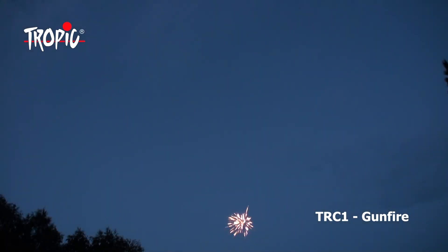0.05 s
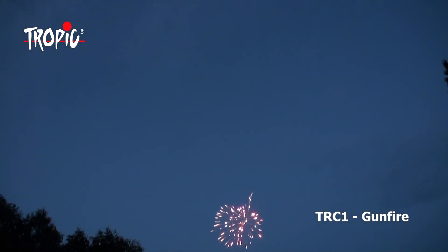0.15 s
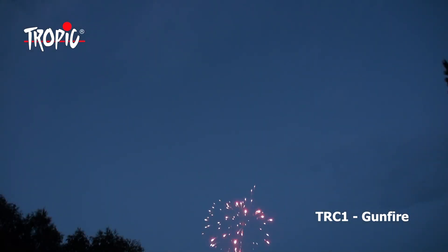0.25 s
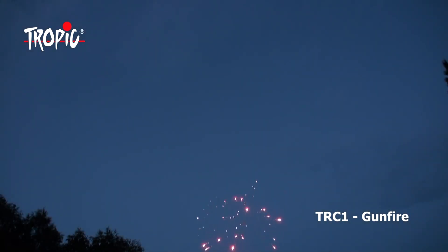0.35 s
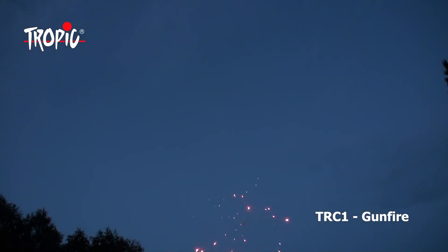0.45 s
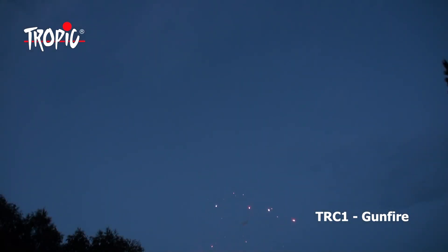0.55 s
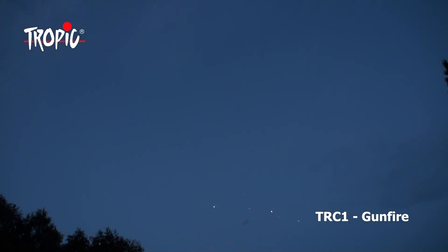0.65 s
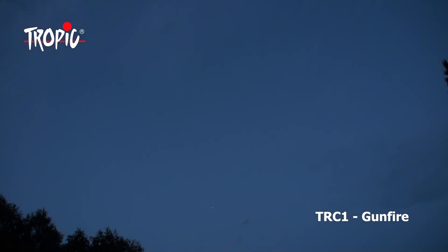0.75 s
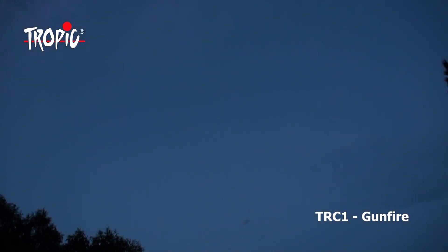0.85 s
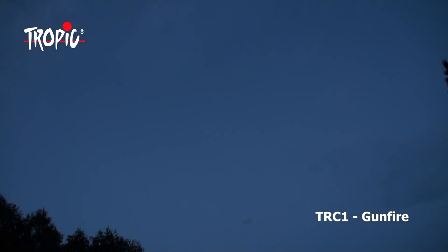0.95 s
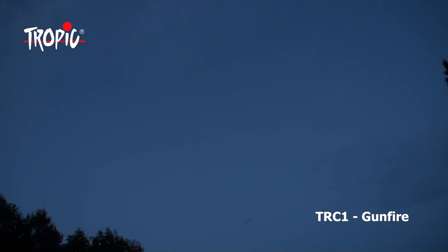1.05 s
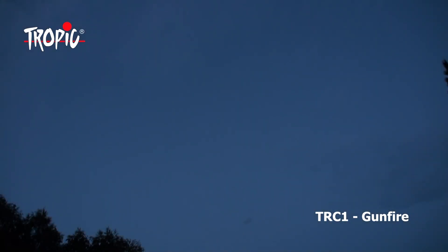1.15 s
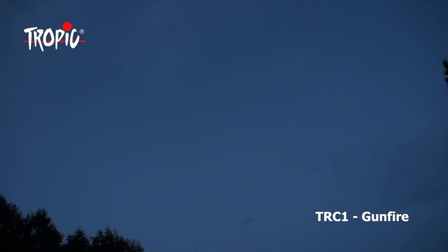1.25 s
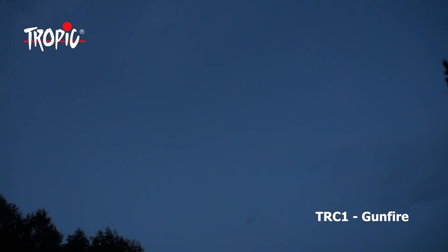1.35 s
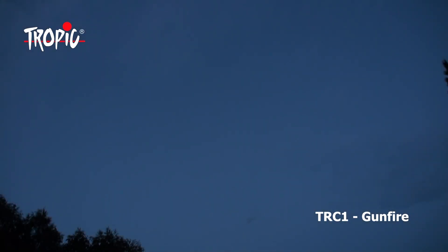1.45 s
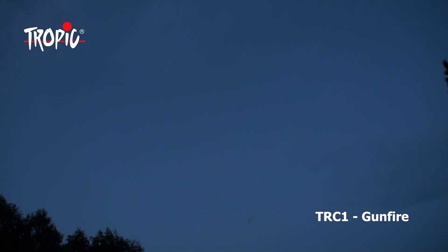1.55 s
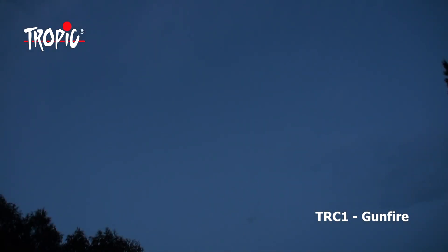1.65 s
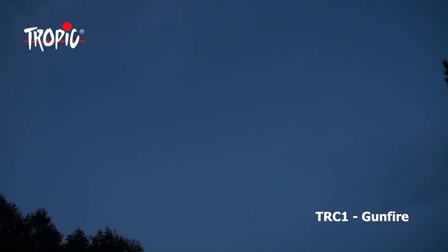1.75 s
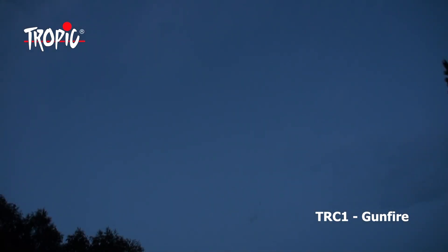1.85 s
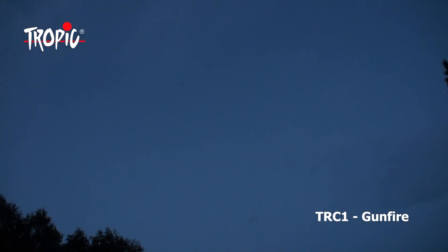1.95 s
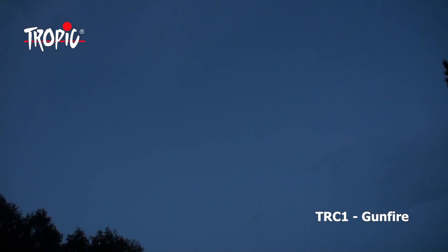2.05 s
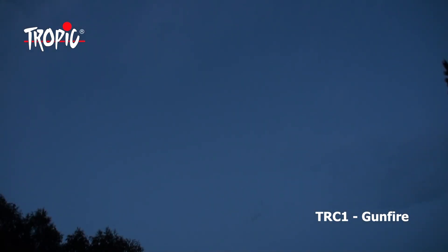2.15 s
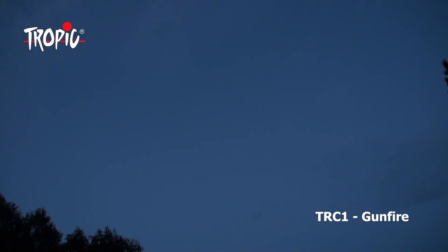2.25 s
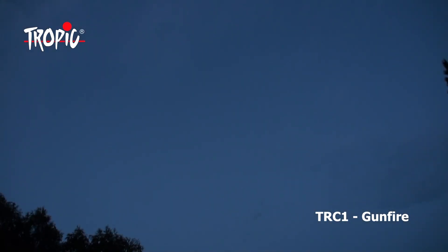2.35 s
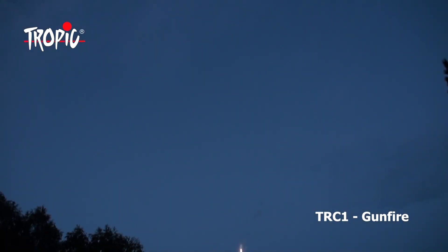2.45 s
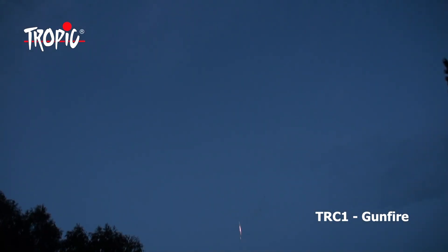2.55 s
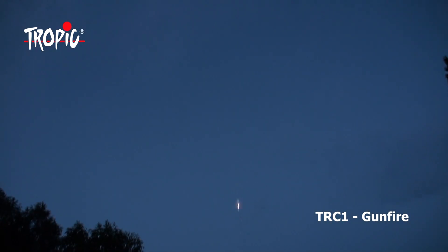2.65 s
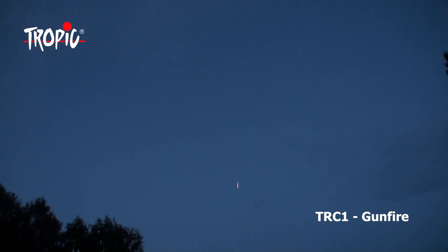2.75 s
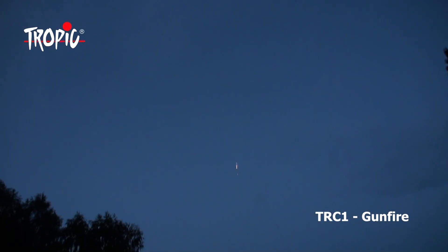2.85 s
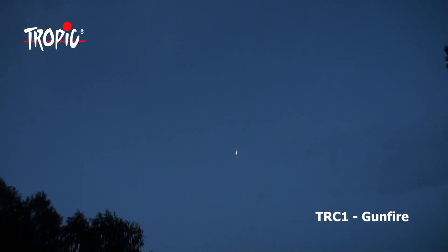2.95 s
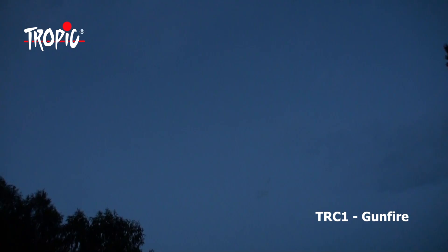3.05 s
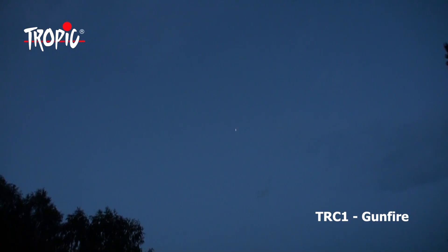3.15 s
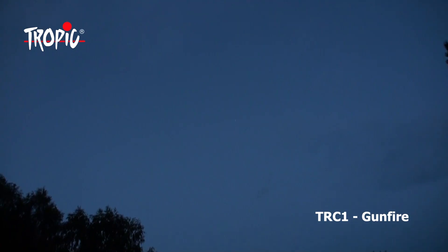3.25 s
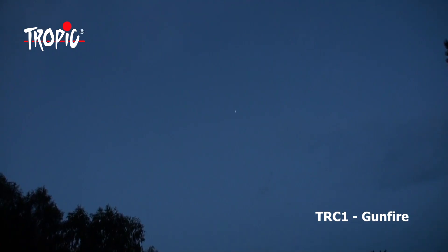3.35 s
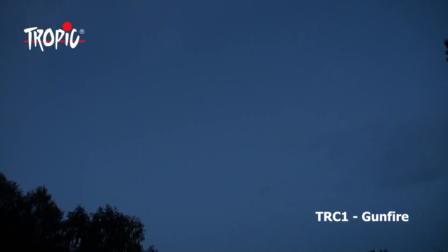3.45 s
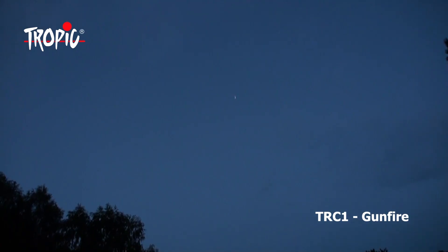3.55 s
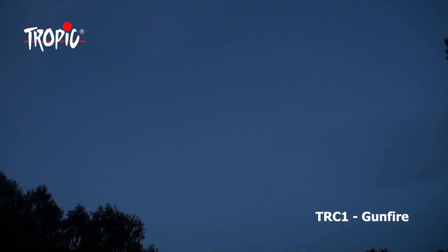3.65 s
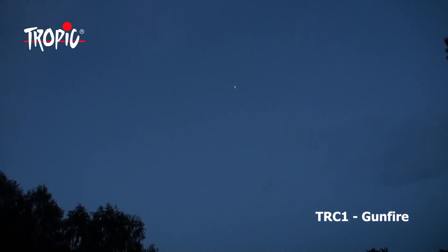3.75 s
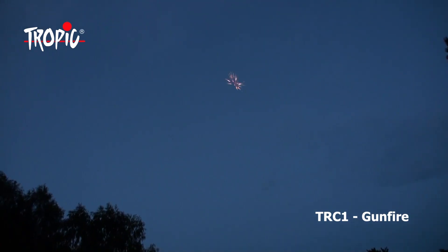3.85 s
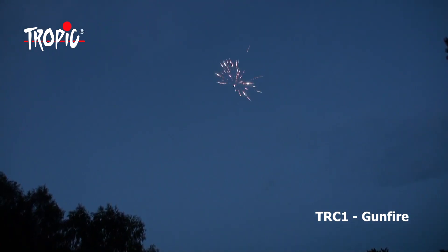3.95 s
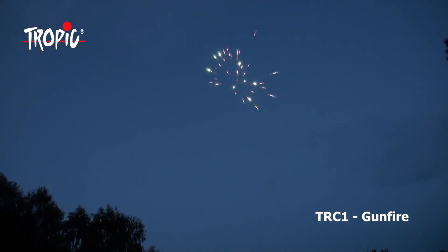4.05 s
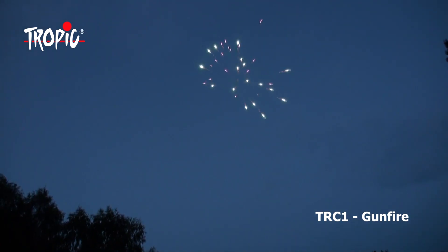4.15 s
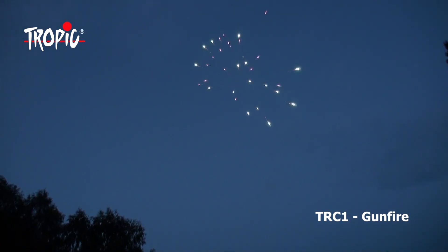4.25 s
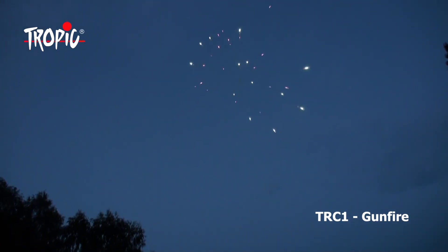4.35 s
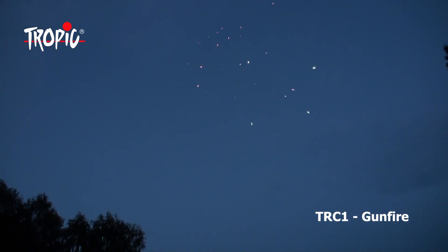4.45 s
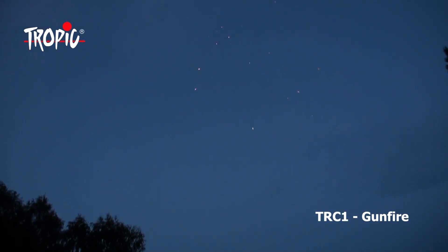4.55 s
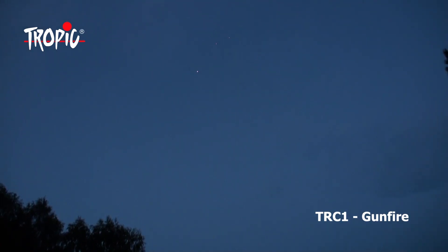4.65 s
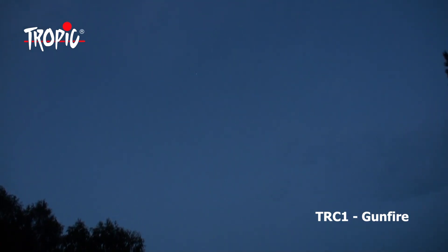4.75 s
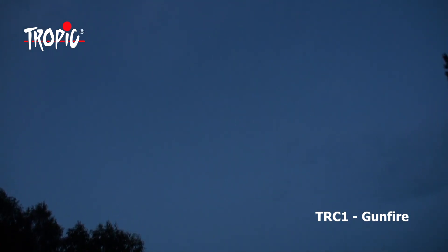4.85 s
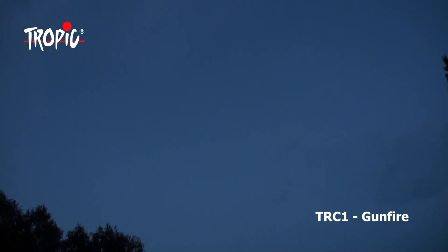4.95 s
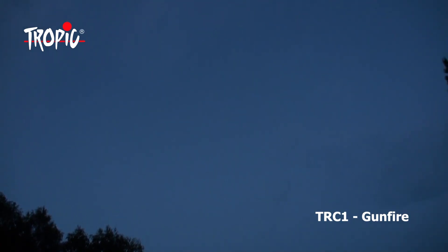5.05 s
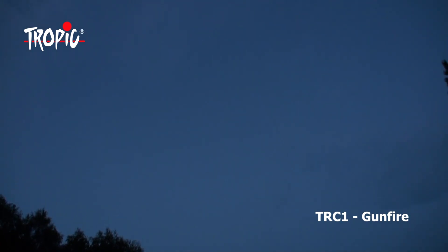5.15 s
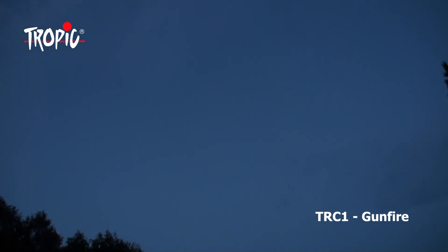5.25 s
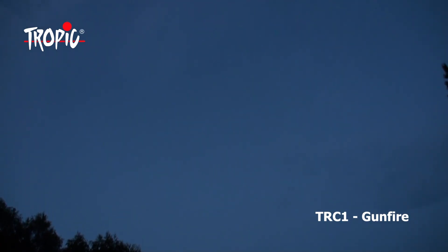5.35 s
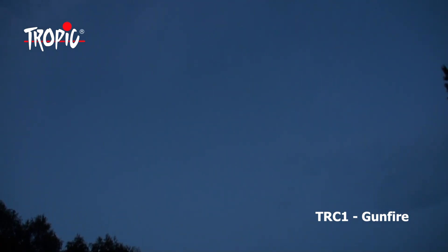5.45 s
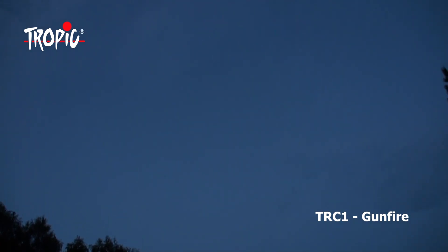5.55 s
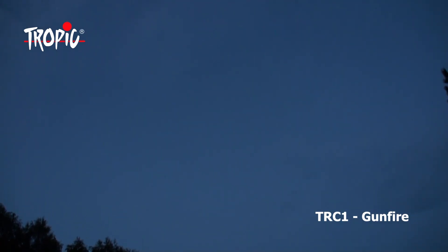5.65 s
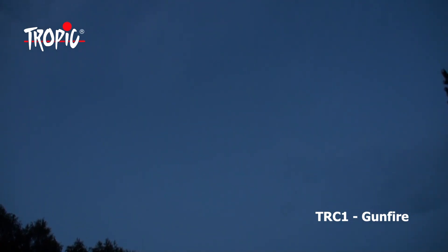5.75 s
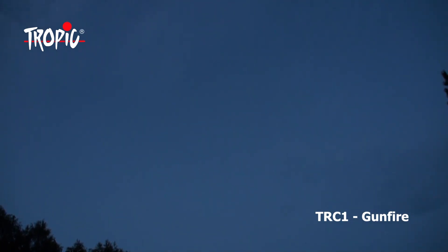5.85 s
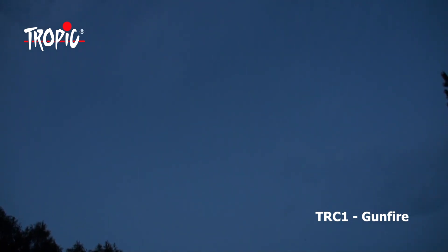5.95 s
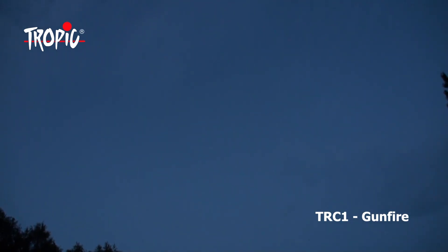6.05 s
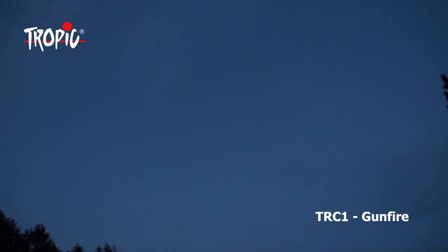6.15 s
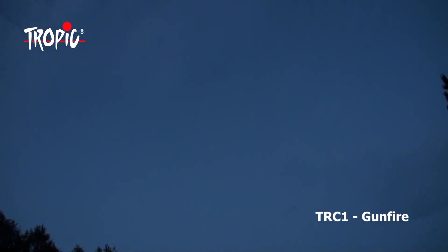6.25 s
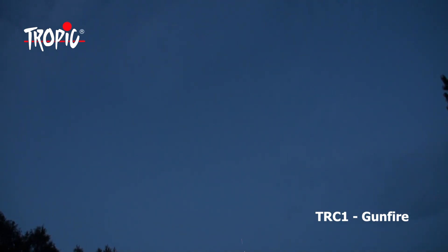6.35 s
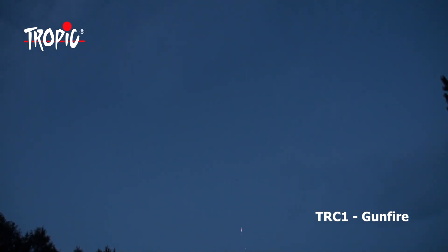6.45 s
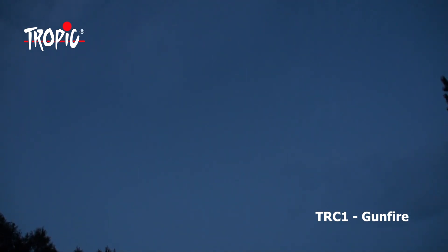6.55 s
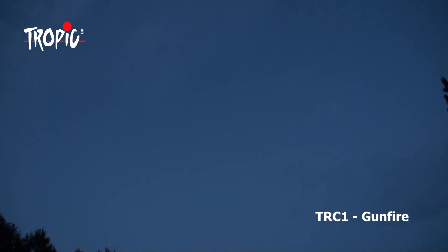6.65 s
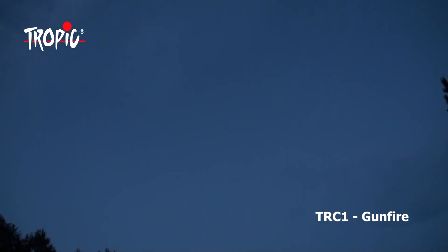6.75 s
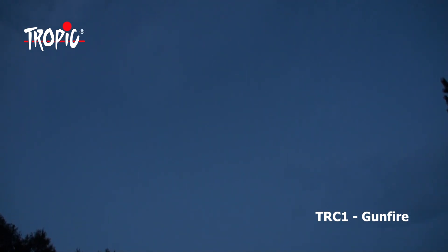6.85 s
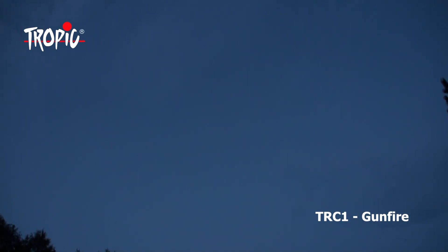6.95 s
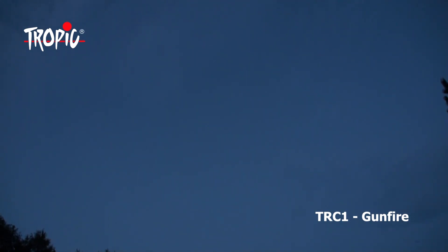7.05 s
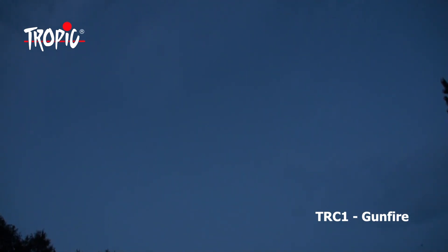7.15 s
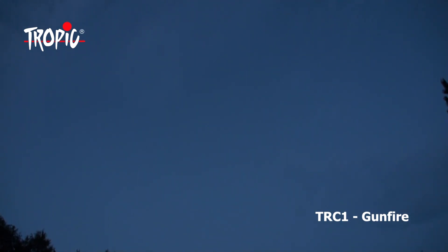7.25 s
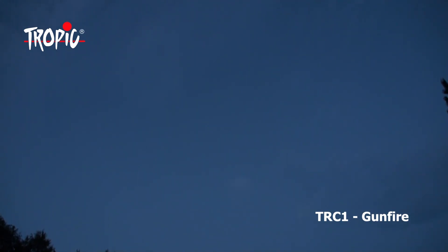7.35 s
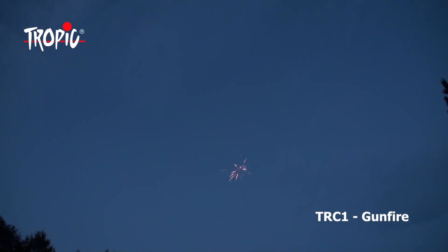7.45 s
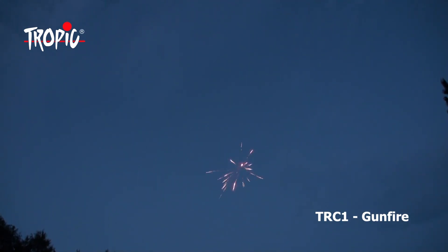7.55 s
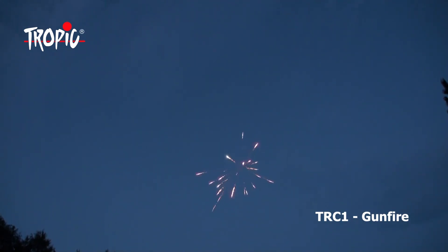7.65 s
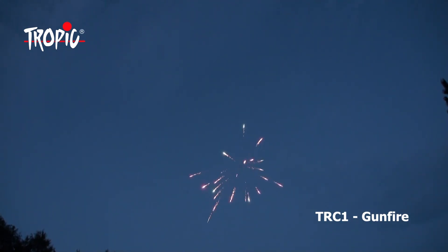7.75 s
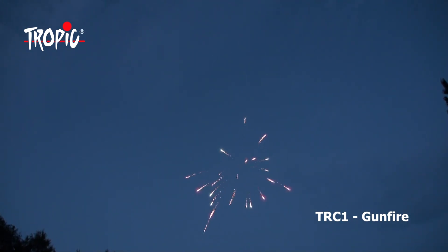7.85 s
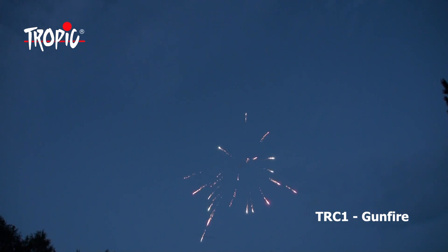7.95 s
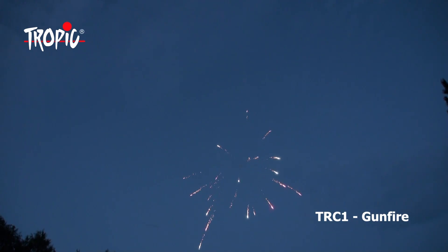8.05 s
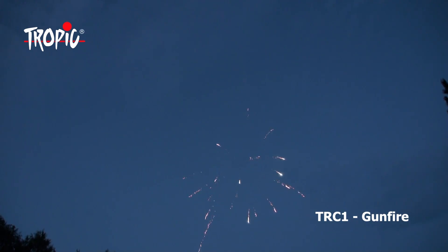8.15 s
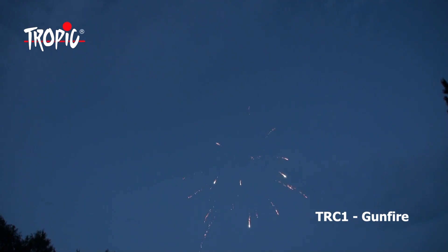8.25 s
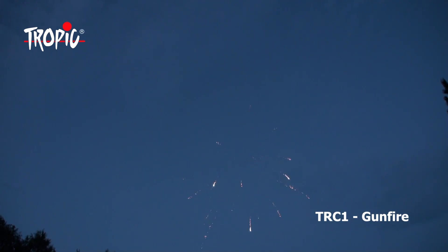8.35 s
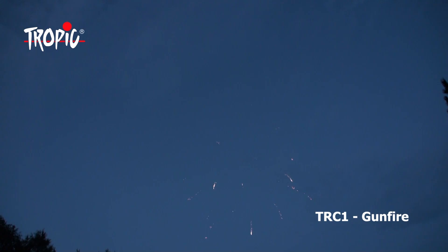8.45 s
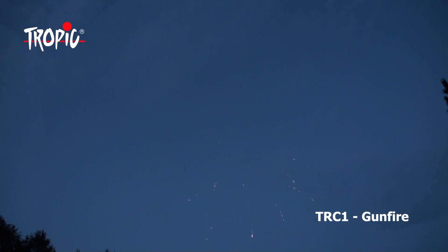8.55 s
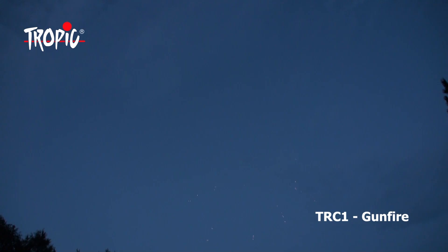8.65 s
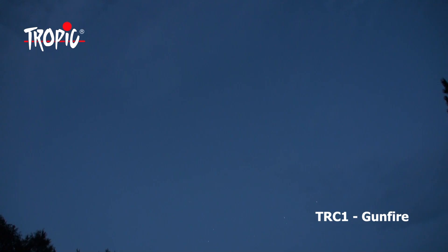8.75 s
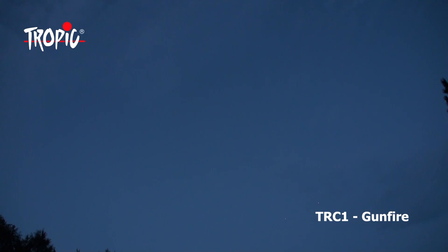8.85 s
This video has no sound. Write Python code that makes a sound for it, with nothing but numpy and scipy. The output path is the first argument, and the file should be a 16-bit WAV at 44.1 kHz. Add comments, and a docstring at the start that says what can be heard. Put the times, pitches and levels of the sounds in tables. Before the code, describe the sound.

Firework shots in open air, alternating loud overhead bangs and dry tube cracks, with rushing tree reflections, dull faraway rumbling and quiet hiss between.

```python
"""Roman candle in the open

Three shells burst overhead, each a broadband pulse with near reflections; a thin bright crack follows two of them.
Between them the tube fires twice: a crack that swings both ways and a short low thump.
Trees and ground scatter each shot into a dense, dying rush of noise, and a dull roll with knocks comes from afar.
Under it lie a low rumble, a faint drone, a fine high hiss, one small tick and a few thin, fluttering whistles."""
import sys
import numpy as np
from scipy import signal
from scipy.fft import rfft, irfft, next_fast_len
from scipy.io import wavfile
from scipy.ndimage import uniform_filter1d

SR = 44100
rng = np.random.default_rng(int(sys.argv[2]) if len(sys.argv) > 2 else 0)


def materialize(psi):
    """Save the field psi as 16-bit PCM at rate SR to the path in sys.argv[1].

    A 1-D psi becomes a single channel; in a 2-D psi each row is a channel.
    """
    bounded = np.clip(np.atleast_2d(psi).T, -1, 1)
    quanta = np.round(bounded * 32767).astype(np.int16)
    wavfile.write(sys.argv[1], SR, quanta)


N = 392490


def gain_of(db):
    """Decibels to a gain."""
    return 10 ** (np.asarray(db) / 20)


def evened(x):
    """Scales a sound to rms 1."""
    return x / np.sqrt(np.mean(x ** 2) + 1e-20)


def read(table, hz):
    """Reads every column of a table along a log-frequency axis."""
    f, *columns = np.transpose(table)
    return [np.interp(np.log(hz + 1), np.log(f + 1), c) for c in columns]


def curve(rows, t):
    """Gain that follows rows of [t/s, level/dB]."""
    return gain_of(np.interp(t, *np.transpose(rows)))


def add(mix, start_s, sound):
    """Mixes a stereo sound in at its start time."""
    part = mix[:, max(round(start_s * SR), 0):][:, :sound.shape[1]]
    part += sound[:, :part.shape[1]]


def smooth_noise(shape, count):
    """Noise averaged over count samples, rms 1."""
    return evened(uniform_filter1d(rng.standard_normal(shape), size=count))


def drift(size, count):
    """A slow random wander of rms 1 that changes over about count samples."""
    return evened(uniform_filter1d(uniform_filter1d(rng.standard_normal(size), count), count))


# How the two microphone ports differ:
# [f/Hz, coherence (0-1), phase by which left leads/rad, left-right level/dB]
PORT_PAIR = [(49.9, 0.88, 1.3, -9), (129.7, 0.96, 1.12, -10), (300, 0.86, 1.11, -5.5),
             (650, 0.89, 1.2, -2.2), (1290, 0.81, 1.38, -4), (2500, 0.64, 1.36, -6.5),
             (4600, 0.45, 0.82, -8.5), (7000, 0.21, 0.44, -11), (9900, 0.17, -0.89, -0.5),
             (13200, .1, .6, -5)]


def ports(white, colour, balance=None):
    """Two unrelated noises become one coloured sound from all around, as the two ports hear it; rms 1."""
    hz = np.fft.rfftfreq(white.shape[1], 1 / SR)
    same, lead, lean_db = read(PORT_PAIR, hz)
    if balance is not None:
        lean_db = read(balance, hz)[0]
    same = np.clip(same, 0, 1)
    shared, separate = rfft(white)
    left = same * shared + np.sqrt(1 - same ** 2) * separate
    left = left * np.exp(1j * lead) * gain_of(lean_db)
    level = gain_of(read(colour, hz)[0]) / np.sqrt(1 + gain_of(lean_db) ** 2)
    return evened(irfft(np.array([left, shared]) * level, white.shape[1]))


def wash(colour, balance=None, lumpy_db=0, lump_s=.02):
    """Coloured noise as long as the scene, whose strength comes in lumps."""
    size = next_fast_len(N, True)
    lumps = smooth_noise(size, max(int(lump_s * SR), 1))
    return ports(rng.standard_normal((2, size)) * gain_of(lumpy_db * lumps), colour, balance)[:, :N]


def knock(colour, rise_s, t60, size=8192):
    """A short smeared knock: coloured noise with a quick rise and an exponential decay."""
    t = np.arange(size) / SR
    noise = ports(rng.standard_normal((2, size)), colour)
    return noise * (1 - np.exp(-t / rise_s)) * gain_of(-60 * t / t60)


def pulse(colour, size=4096):
    """The sharpest causal pulse with a given spectrum (minimum phase), peak 1."""
    hz = abs(np.fft.fftfreq(size, 1 / SR))
    log_gain = np.log(gain_of(read(colour, hz)[0]))
    wave = np.fft.ifft(np.exp(np.conj(signal.hilbert(log_gain)))).real
    return wave / abs(wave).max()


# Stereo lean of the direct waves: [f/Hz, left-right level/dB]
DIRECT_BALANCE = [(35, 0), (70, -2), (140, -5.5), (350, -0.5), (900, -1.5), (2500, -9.5), (6000, -15.5)]


def arrive(wave, paths, left_db, size=8192):
    """A wave reaches the ports as a sum of delayed copies: the direct path and near surfaces."""
    hz = np.fft.rfftfreq(size, 1 / SR)
    same, lead, _ = read(PORT_PAIR, hz)
    right = rfft(wave, size) * sum(k * np.exp(-2j * np.pi * hz * max(s, 0)) for s, k in paths)
    left = right * np.exp(1j * lead * same) * gain_of(read(DIRECT_BALANCE, hz)[0] + left_db)
    fade_out = np.minimum(np.linspace(2, 0, size), 1) ** 2
    return irfft([left, right]) * fade_out


def foliage(colour, uneven_db, size=54000):
    """Countless overlapping reflections, arriving in clumps."""
    clumps = gain_of(uneven_db * smooth_noise(size, 130))
    return ports(rng.standard_normal((2, size)) * clumps, colour)


def swell(t, start_db, rise_s, hold_s, fall_db_per_s, knee_db, late_db_per_s):
    """Gain of the scattered sound against its delay: it builds up, holds, falls fast and lingers below a knee."""
    late = np.maximum(t - hold_s, 0)
    knee_s = -knee_db / fall_db_per_s
    fall_db = np.maximum(-fall_db_per_s * late, knee_db - late_db_per_s * (late - knee_s))
    return gain_of(start_db * np.exp(-t / rise_s) + fall_db)


def die_away(taps, colour, fade, returns, stretch, patchy_db=1.0, count=18):
    """Later reflections weaken, some bands faster than others; trees and slopes throw single bands back."""
    t = np.arange(taps.shape[1]) / SR
    hz, centres = np.fft.rfftfreq(len(t), 1 / SR), np.geomspace(40, 15000, count)
    spectrum = rfft(taps)
    delay, spread, return_hz, octaves, db = np.transpose(returns)
    swells = db[:, None] * np.exp(-((t - delay[:, None]) / spread[:, None]) ** 2)
    out = np.zeros(taps.shape)
    for centre, pick, loss in zip(centres, np.eye(count), read(colour, centres)[1]):
        band = irfft(spectrum * read(np.c_[centres, pick], hz)[0])
        patches = patchy_db * smooth_noise(len(t), 1800)  # each band rolls on its own
        thrown_back = np.exp(-(np.log2(centre / return_hz) / octaves) ** 2) @ swells
        out += band * gain_of(thrown_back - loss * t / stretch + patches)
    return out * swell(t / stretch, *fade)


# Level of the high hiss before its trim, which the rumble also follows: [t/s, level/dB]
HISS_LEVEL = [(0.12, -52), (0.6, -61.5), (1.3, -64), (2.1, -61), (2.8, -63.5), (3.9, -61.5), (4.9, -71),
              (5.7, -65.5), (6.4, -66.5), (7.5, -66.5), (8.35, -62.5), (8.85, -68.5)]
# Spectrum of the still air: [f/Hz, level/dB per Hz]
AIR_COLOUR = [(20, -13), (55, 2), (110, -1), (250, -6.5), (600, -8), (1500, -13), (3500, -21.5),
              (7000, -25.5), (13000, -33.5), (16000, -37)]
# Stereo lean of the air: [f/Hz, left-right level/dB]
AIR_LEAN = [(60, -20), (130, -16.5), (300, -9.5), (650, -2), (1300, 0.5), (3000, 3), (7000, -1.5),
            (13000, -10)]


def air(level_db=-49.5, follow=0.19, usual_db=-64):
    """A low outdoor rumble of noise that swells and sinks a little with the hiss."""
    t = np.arange(N) / SR
    sway = (curve(HISS_LEVEL, t) / gain_of(usual_db)) ** follow
    return gain_of(level_db) * sway * wash(AIR_COLOUR, AIR_LEAN, lumpy_db=0.5, lump_s=.08)


# Level of the drone: [t/s, level/dB]
DRONE_LEVEL = [(0, -49), (.3, -56), (1.2, -67), (1.7, -55), (2.1, -56), (2.7, -71), (8.9, -84)]
# Spectrum of the drone: [f/Hz, level/dB per Hz]
DRONE_SPECTRUM = [(120, -47), (245, -16), (280, -4), (320, -20), (700, -50), (4000, -90)]
# Stereo lean of the drone and of the far roll: [f/Hz, left-right level/dB]
FAR_BALANCE = [(150, -19), (350, -11), (700, -9.5), (1400, -7), (4000, -11)]


def drone():
    """A faint low drone, narrow-band noise, comes and goes."""
    return curve(DRONE_LEVEL, np.arange(N) / SR) * wash(DRONE_SPECTRUM, FAR_BALANCE)


# Spectrum of the hiss: [f/Hz, level/dB per Hz]
HISS_SPECTRUM = [(3000, -25), (6500, -10.5), (8200, -1.5), (10000, -1.5), (11500, -5.5), (13500, -10),
                 (16000, -21)]


def hiss(trim_db=3.5):
    """A fine, slightly lumpy high hiss: treble noise of changing level."""
    balance = [(7000, -12), (9500, 1.0), (13000, -2)]  # [f/Hz, left-right level/dB]
    noise = wash(HISS_SPECTRUM, balance, lumpy_db=1.1, lump_s=0.023)
    return gain_of(trim_db) * curve(HISS_LEVEL, np.arange(N) / SR) * noise


def tick(start_s=1.765, level_db=-43):
    """One small tick: a short knock of mostly mid-treble noise."""
    out = np.zeros((2, N))
    colour = [(800, -15), (2500, 3), (5500, -2), (9000, -13), (15000, -20)]  # [f/Hz, level/dB per Hz]
    add(out, start_s, gain_of(level_db) * knock(colour, rise_s=0.0022, t60=0.11))
    return out


# Whistles, before the left-right trim: [t/s, length/s, f/Hz, level/dB, flutter/share of the pitch]
WHISTLE_TONES = [(.62, .26, 11000, -65, .009), (.91, .16, 11700, -53, 0.076), (3.22, .24, 10950, -63, .009),
                 (5.45, .35, 11300, -68, 0.0118), (8.0, 0.57, 11400, -64, .012)]


def whistles(upper_ratio=1.36, upper_db=-6, wander=.028):
    """Faint sines that swell, wander in pitch and fade, each with a second one above it."""
    out = np.zeros((2, N))
    for s, length, hz, db, flutter in WHISTLE_TONES:
        size = int(length * SR)
        glide = hz * (1 + wander * drift(N, count=1700)[:size])
        wobble = 1 + flutter * smooth_noise((2, N), 60)[:, :size]
        angle = 2 * np.pi * np.cumsum(glide * wobble, axis=1) / SR
        tones = evened(np.sin(angle) + gain_of(upper_db) * np.sin(upper_ratio * angle))
        add(out, s, tones * gain_of(db) * signal.windows.tukey(size, .5))
    return out * gain_of([[-5], [1]])  # left, right


# Distant slopes that swell the roll of a shot; the high shells reach farther ones:
# [delay t/s, spread/s, level/dB]
BURST_FAR_SLOPES = [(.5, 0.058, 7), (.76, 0.15, 3.5), (1.33, .14, 5.5), (1.95, 0.24, 8)]
LAUNCH_FAR_SLOPES = [(.46, 0.045, 2.4), (.75, 0.059, 4.4), (.98, 0.13, 8.1), (1.22, 0.11, 4.9)]
# Spectra of the roll; a launch has more body and a trace of its crack: [f/Hz, level/dB per Hz]
BURST_ROLL_SPECTRUM = [(100, -20), (280, -10.5), (400, -5), (520, -0.5), (640, -1), (770, 2), (1100, -7.5),
                       (1800, -11), (3200, -20), (6000, -34), (12000, -61)]
LAUNCH_ROLL_SPECTRUM = [(100, -20), (280, -2.5), (380, -0.5), (740, 0.5), (1100, -9.5), (1800, -16),
                        (4000, -24.5), (12000, -33)]
# Echoes that stand out as knocks, before trim and envelope: [t/s, level/dB]
ECHO_KNOCKS = [(1.430, -30), (1.497, -28), (2.070, -31.5), (2.917, -32.5), (3.233, -41), (5.244, -35),
               (5.324, -31.5), (5.496, -31.5), (6.749, -35), (7.011, -38), (8.082, -23)]
# Spectrum of those knocks: [f/Hz, level/dB per Hz]
ECHO_SPECTRUM = [(140, -30), (520, -8), (740, 1), (1000, -7), (4200, -51), (14000, -68)]


def roll(shots, slopes, fall_db_per_s, rise_s=0.5):
    """Every shot sets off the same dying roll, which swells as each distant slope answers."""
    t, power = np.arange(N) / SR, np.zeros(N)
    for s, *_, roll_db in shots:
        age = np.maximum(t - s, 0)
        answers = sum(db * np.exp(-((age - delay) / spread) ** 2) for delay, spread, db in slopes)
        power += (np.minimum(age / rise_s, 1) * gain_of(roll_db + answers - fall_db_per_s * age)) ** 2
    return np.sqrt(power)


def far_echoes(echo_db=-3, lumpy_db=1.5, lump_s=.02):
    """Distant slopes and woods return the shots as a dull, lumpy roll with single knocks in it."""
    burst_roll = roll(BURST_SHOTS, BURST_FAR_SLOPES, fall_db_per_s=6.5)
    out = burst_roll * wash(BURST_ROLL_SPECTRUM, FAR_BALANCE, lumpy_db, lump_s)
    launch_roll = roll(LAUNCH_SHOTS, LAUNCH_FAR_SLOPES, fall_db_per_s=9.5)
    out += launch_roll * wash(LAUNCH_ROLL_SPECTRUM, FAR_BALANCE, lumpy_db, lump_s)
    for s, db in ECHO_KNOCKS:
        add(out, s, gain_of(db + echo_db) * knock(ECHO_SPECTRUM, rise_s=0.002, t60=0.12))
    return out


# Lift charges in the tube:
# [t/s, blast level/dB, scatter level/dB, stretch of its decay (factor), far roll level/dB]
LAUNCH_SHOTS = [(2.241, 1, -17, 1.026, -46), (5.8407, 0.5, -20, 0.96, -43.5)]
# Spectrum of the tube's crack: [f/Hz, level/dB per Hz]
CRACK_FRONT = [(40, -10), (300, 10), (800, 3), (1800, 5.5), (4300, 2.5), (7200, -3), (12000, -24),
               (16000, -29)]
# Direct path and near reflections of crack and thump; one large surface returns the long wave of the thump:
# [delay t/s, signed strength (gain)]
TUBE_CRACK_PATHS = [(0, 0.89), (.0019, -0.25), (0.0163, 0.54), (0.0266, .6), (0.0312, 0.11)]
TUBE_THUMP_PATHS = [(.0008, 0.88), (0.0161, 1.25)]
# Scattered sound: [f/Hz, level/dB per Hz, extra loss/dB per s]
LAUNCH_SCATTERED = [(30.6, -27, 66), (69.3, -5.5, 31), (128.2, -5.5, 10), (200, 0, 9.6), (260, 0, 12),
                    (390, -11, 5.8), (674, -6.5, 5.5), (1120, -7, 4.3), (2000, -4.5, 1), (3520, -9.5, 4.4),
                    (6500, -13.5, 12), (10000, -21.5, 34), (13000, -22.5, 45), (15500, -51, 67)]
# Its course: [start level/dB, rise/s, hold/s, fall/dB per s, knee level/dB, late fall/dB per s]
LAUNCH_COURSE = (-10.5, .012, 0.09, 91, -17.5, 54)
# Stands of trees and slopes that throw back one band: [delay t/s, spread/s, f/Hz, width/octaves, level/dB]
LAUNCH_BAND_RETURNS = [(0.019, 0.014, 180, 0.93, 5.9), (.16, 0.039, 245, 0.25, 3.6),
                       (.43, .05, 1900, .6, 5.3), (.36, .08, 2900, 0.17, 2.9), (0.47, 0.052, 160, .5, 4.3)]


def tube_thump(hz=185, t60=0.019, level_db=0.5, rise_s=0.0033, lowest_hz=70):
    """Gas leaving the tube: a short decaying sine."""
    t = np.arange(4096) / SR
    thump = -np.sin(2 * np.pi * hz * t) * (1 - np.exp(-t / rise_s)) * gain_of(level_db - 60 * t / t60)
    # a narrow tube radiates little deep bass
    return signal.lfilter(*signal.butter(1, lowest_hz, "high", fs=SR), thump)


def tube_crack(rebound=1.32, rebound_s=0.00017):
    """The pressure swings both ways: a sharp front and its stronger, opposite rebound."""
    front = pulse(CRACK_FRONT)
    t = np.arange(len(front)) / SR
    return rebound * np.interp(t - rebound_s, t, front, left=0) - front


def launches():
    """A crack and a low thump from the tube; it stands still, so its reflections share one pattern."""
    out = np.zeros((2, N))
    blast = arrive(tube_crack(), TUBE_CRACK_PATHS, left_db=1.5)
    blast += arrive(tube_thump(), TUBE_THUMP_PATHS, left_db=-1.0)
    taps = foliage(LAUNCH_SCATTERED, uneven_db=1.0)
    for s, blast_db, scatter_db, stretch, _ in LAUNCH_SHOTS:
        rush = die_away(taps, LAUNCH_SCATTERED, LAUNCH_COURSE, LAUNCH_BAND_RETURNS, stretch)
        add(out, s, gain_of(blast_db) * blast)
        add(out, s, gain_of(scatter_db) * rush)
    return out


# Sharp cracks hard behind a burst: [t/s, level/dB]
BRIGHT_CRACKS = [(.1688, -2), (4.0125, -1)]
# Their spectrum: [f/Hz, level/dB per Hz]
BRIGHT_CRACK_SPECTRUM = [(100, -20), (1500, 0), (4000, -2), (9000, -1), (16000, -16)]


def cracks():
    """Thin, bright pulses that arrive just after the blast, without reflections."""
    out = np.zeros((2, N))
    wave = arrive(pulse(BRIGHT_CRACK_SPECTRUM), [(0, 1)], left_db=5)
    for s, db in BRIGHT_CRACKS:
        add(out, s, gain_of(db) * wave)
    return out


# Shells bursting overhead:
# [t/s, blast level/dB, scatter level/dB, stretch of its decay (factor), extra boom level/dB,
#  extra bass level/dB, far roll level/dB]
BURST_SHOTS = [(.1558, 3.5, -13.5, 0.94, -0.5, -6, -38.5), (4.0008, 0.5, -14.5, 0.98, 1.5, 0.5, -38),
               (7.5794, 1, -15, 0.99, 1.4, -4, -38.5)]
# Spectrum of the direct wave: [f/Hz, level/dB per Hz]
BURST_FRONT = [(25, -9.5), (70, -7), (140, -6.5), (260, 3.5), (600, -1), (1000, -3.5), (2000, -12),
               (6000, -24), (12000, -22.5), (16000, -42)]
# Direct path and near reflections: [delay t/s, signed strength (gain)]
BURST_NEAR_PATHS = [(0, 0.68), (.0017, 1), (.0066, 0.98), (0.0119, 0.92), (.0190, 0.67), (.0260, 0.45),
                    (.0310, 0.55)]
# Scattered sound: [f/Hz, level/dB per Hz, extra loss/dB per s]
BURST_SCATTERED = [(30, -24, 50), (70, -13.5, 42), (128, -7.5, 3.5), (226, -4, 3), (370, 0, 24.5),
                   (735, 2.5, 3.5), (1140, -6, -13.5), (1940, -7, -1), (3700, -12, 7.5), (6720, -15, 15),
                   (10000, -21, 40), (12800, -21.5, 55), (15500, -38, 68)]
# Its course: [start level/dB, rise/s, hold/s, fall/dB per s, knee level/dB, late fall/dB per s]
BURST_COURSE = (-7.5, 0.01, 0.18, 54.5, -20.5, 33.5)
# Stands of trees and slopes that throw back one band: [delay t/s, spread/s, f/Hz, width/octaves, level/dB]
BURST_BAND_RETURNS = [(.015, 0.023, 400, 1, 9), (.17, 0.035, 383, 0.49, 2.5), (.28, 0.064, 1420, 0.25, -1),
                      (.48, 0.093, 484, 0.56, 14), (.61, 0.057, 271, 0.39, 19.5)]


def bursts(boom_hz=400, boom_octaves=0.85, bass_hz=190):
    """Each shell bursts at another spot, so the trees answer its blast differently every time."""
    out = np.zeros((2, N))
    blast = arrive(pulse(BURST_FRONT), BURST_NEAR_PATHS, left_db=-0.6)
    hz, db, _ = np.transpose(BURST_SCATTERED)
    boom = np.exp(-(np.log2(hz / boom_hz) / boom_octaves) ** 2)
    bass = 1 / (1 + (hz / bass_hz) ** 4)
    for s, blast_db, scatter_db, stretch, boom_db, bass_db, _ in BURST_SHOTS:
        taps = foliage(np.c_[hz, db + boom_db * boom + bass_db * bass], uneven_db=0.85)
        rush = die_away(taps, BURST_SCATTERED, BURST_COURSE, BURST_BAND_RETURNS, stretch)
        add(out, s, gain_of(blast_db) * blast)
        add(out, s, gain_of(scatter_db) * rush)
    return out


def scene():
    """The quiet outdoors, the far echoes and the shots."""
    background = air() + drone() + hiss() + tick() + whistles()
    return background + far_echoes() + launches() + cracks() + bursts()


# The left port is deaf to the top treble: [f/Hz, level/dB]
LEFT_PORT_TREBLE = [(11000, 0), (11800, -5), (12600, -12), (14000, -24), (16000, -30)]


def record(dry, knee=0.36, edge_hz=15900):
    """The left port loses top treble, peaks above the knee bend towards full scale, then a low-pass."""
    hz = np.fft.rfftfreq(N, 1 / SR)
    left = irfft(rfft(dry[0]) * gain_of(read(LEFT_PORT_TREBLE, hz)[0]), N)
    heard = np.array([left, dry[1]])
    over = np.maximum(abs(heard) - knee, 0)
    bent = np.sign(heard) * (1 - knee) * np.tanh(over / (1 - knee))
    rounded = np.clip(heard, -knee, knee) + bent
    low_pass = signal.firwin(511, edge_hz, window=("kaiser", 9), fs=SR)
    return signal.oaconvolve(rounded, low_pass[None], "same")


dry = scene()
out = record(dry)
materialize(out)
```